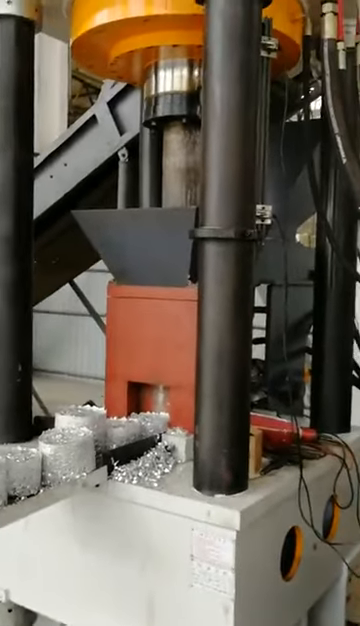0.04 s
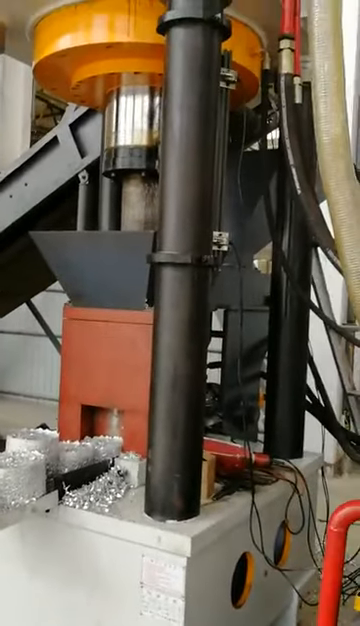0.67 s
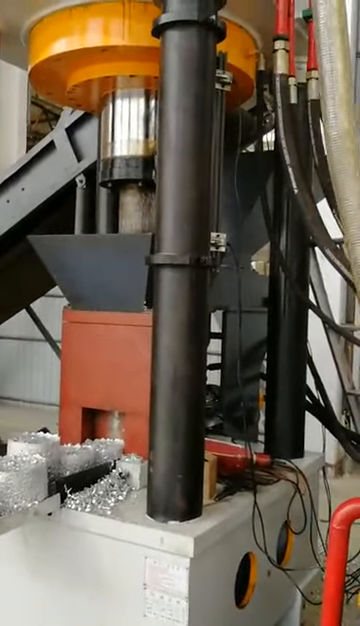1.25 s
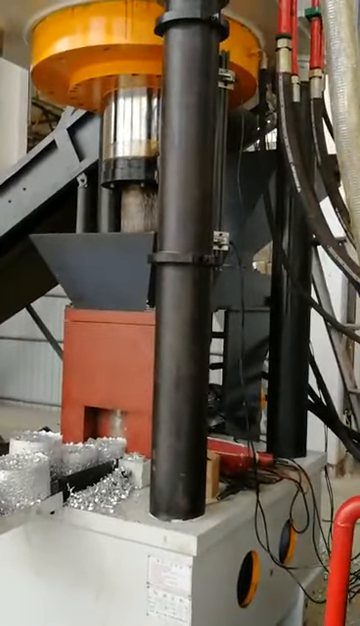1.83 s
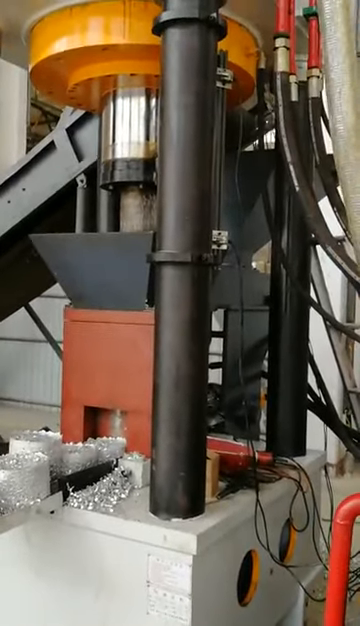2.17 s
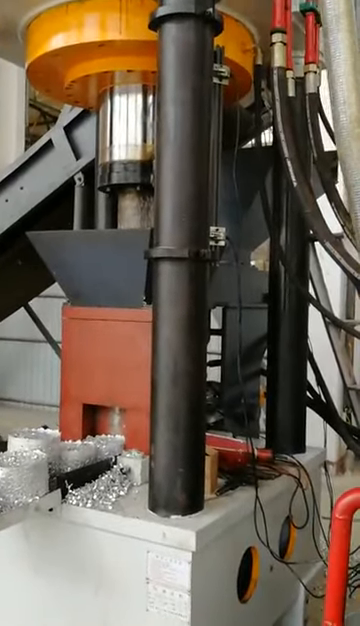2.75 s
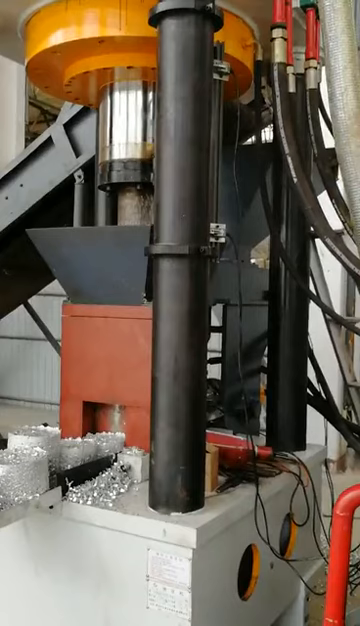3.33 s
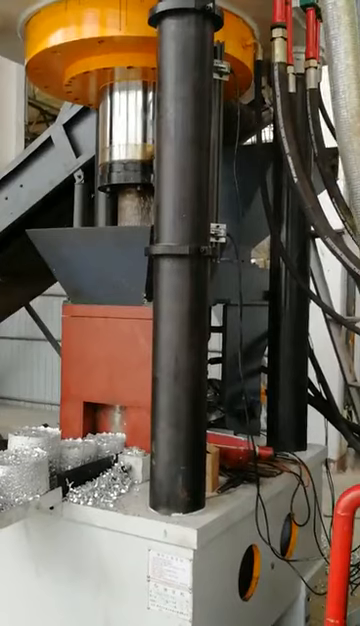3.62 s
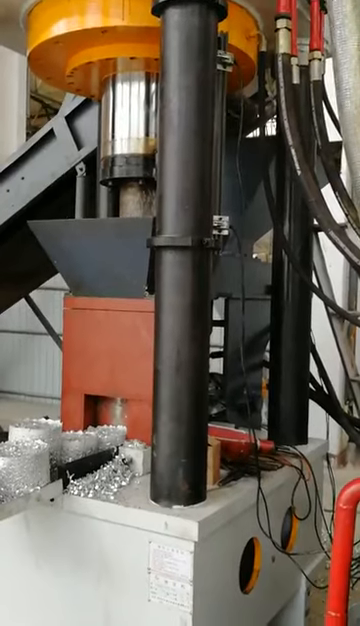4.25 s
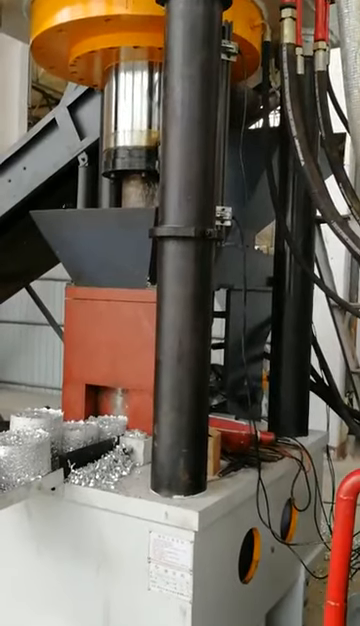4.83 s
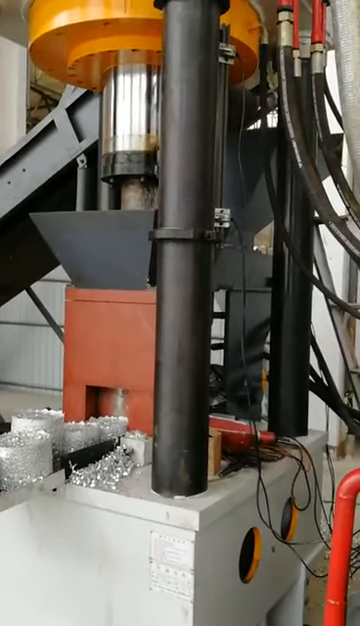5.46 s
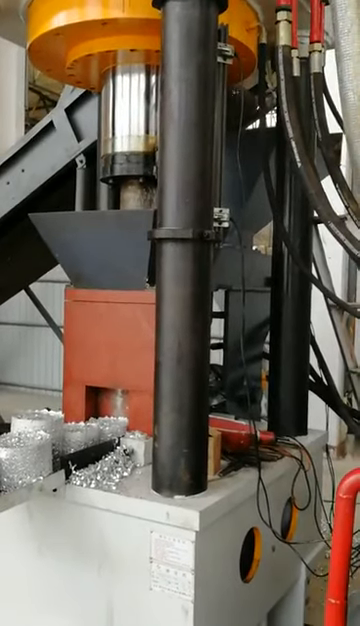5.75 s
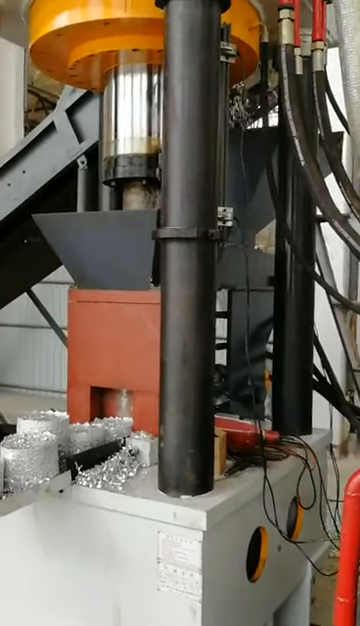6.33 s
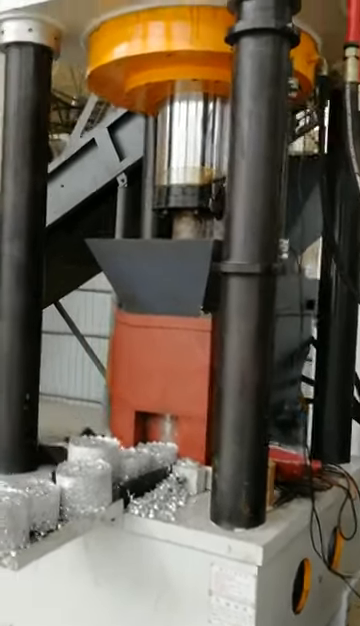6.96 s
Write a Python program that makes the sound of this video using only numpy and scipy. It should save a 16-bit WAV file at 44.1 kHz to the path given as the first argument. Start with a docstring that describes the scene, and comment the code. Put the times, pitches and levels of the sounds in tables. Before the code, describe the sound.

After a moment of light idling, the pumps of a nearby hydraulic press take up the strain and hum with a slow throb, while oil rushes through the ringing tank and pipes. Loose metal chips trickle now and then, finishing in a continuous hissing pour. Thin motor whines and a low rumble fill the workshop behind. The hand-held microphone hears the machine louder and brighter on the left.

```python
"""A deep, slowly throbbing drone with rushing oil and trickling metal chips, ending in a bright hiss.
It is a hydraulic press squeezing chips into briquettes in a workshop. Two seven-piston pumps come
under load; their motors run at almost the same speed, so the hum swells and fades. Oil makes the tank
and pipes ring. Loose chips tick as they fall, now and then at first, and at the end in a steady pour.
Behind it all, motors and fans whine and the floor rumbles."""
import sys
import numpy as np
from scipy import signal
from scipy.fft import rfft, irfft
from scipy.io import wavfile

SR = 44100
rng = np.random.default_rng(int(sys.argv[2]) if len(sys.argv) > 2 else 0)


def store_pcm(level_fs):
    """Save levels as 16-bit WAV."""
    pcm = np.round(np.clip(level_fs, -1, 1) * 32767).astype(np.int16)
    wavfile.write(sys.argv[1], SR, np.atleast_2d(pcm).T)


N = 308259
TIME = np.arange(N) / SR
FREQS = np.maximum(np.fft.rfftfreq(N, 1 / SR), 1)

# how much quieter the shaded right side of the microphone is: (frequency [Hz], left minus right [dB])
RIGHT_SHADE = [(60, 0.5), (174, 0.78), (348, 3), (520, 8.8), (870, 10.1), (1400, 13.8), (2200, 17.3),
               (3400, 21.2), (5200, 22), (7500, 25)]


def pump_drive(idle_hz=175.0, loaded_hz=174.0):
    """Load (1 = full) slows the motors a little. Returns the stroke angle, a turn per stroke, and load."""
    # the pumps idle, work hard as the ram meets the chips, then ease off: (time [s], load [dB])
    load_curve = [(0, -21.5), (.28, -14.5), (.7, -12.5), (.9, 0), (1.45, 1), (3.6, 0), (4.6, 0.5),
                  (5.95, 0.6), (6.99, -2)]
    load = from_db(in_time(load_curve))
    strokes_hz = idle_hz + (loaded_hz - idle_hz) * np.minimum(load, 1)
    return 2 * np.pi * np.cumsum(strokes_hz) / SR, load


def pumps(stroke, load, pistons=7, flutter=0.13, rattle=0.078, jitter=0.014, uneven=0.066,
          roughness=0.41, sway_db=1.5):
    """Two pumps make the oil pressure ripple; the hum throbs as they slide in and out of step."""
    # how much slower the second pump runs: (time [s], speed gap [strokes per s])
    speed_gap = [(0, 0.38), (1.5, 0.26), (2.5, 0.33), (5.5, 0.3295), (7, 0.24)]
    # strong harmonics (multiples of the stroke rate) at full load:
    # (harmonic [number], first pump [dB], second pump [dB], time they cancel most [s])
    strong_tones = [(1, -33.5, -33.5, 1.87), (2, -41, -29.5, 2.14), (3, -52.5, -62, 1),
                    (4, -42, -48, 2.008), (5, -40, -56.5, 3.19)]
    # weaker harmonics at full load; those between are filled in: (harmonic [number], level [dB])
    weak_tones = [(7, -55.5), (8, -61), (9, -61), (10, -53), (11, -58), (12, -69), (14, -60.5), (16, -67.5),
                  (20, -73), (23, -74.5), (26, -76)]
    behind = 2 * np.pi * np.cumsum(in_time(speed_gap)) / SR
    shaft = stroke / pistons
    # unequal pistons nudge the strokes once a turn, adding faint tones beside each strong one
    phase = stroke + jitter * drift(26) + uneven * np.sin(shaft)
    hum = np.zeros(N)
    for harmonic, first_db, second_db, cancel_s in strong_tones:
        apart = harmonic * (behind - np.interp(cancel_s, TIME, behind))
        angle = harmonic * phase + rng.uniform(0, 2 * np.pi)
        pair = from_db(first_db) * np.sin(angle) - from_db(second_db) * np.sin(angle - apart)
        # higher tones sway more in the hall
        sway = from_db(sway_db * harmonic / len(strong_tones) * drift(1.7))
        hum += pair * sway * (1 + flutter * drift(33) + rattle * drift(43))
    harmonics, levels_db = np.transpose(weak_tones)
    for harmonic in range(7, 27):
        angle = harmonic * stroke + rng.uniform(0, 2 * np.pi)
        level = from_db(np.interp(harmonic, harmonics, levels_db))
        hum += level * np.sin(angle + roughness * drift(16)) * (1 + roughness * drift(3.6))
    return np.sqrt(2) * load * hum


def panel(stroke, harmonic=6, waver=0.25, steady_db=-55.5, swell_db=-43, peak_s=1.48, swell_s=0.29):
    """A steel panel buzzes along with the pumps, swelling once as the frame takes up the strain."""
    swell = np.exp(-((TIME - peak_s) / swell_s) ** 2)
    level = from_db(steady_db) + from_db(swell_db) * swell
    return np.sqrt(2) * level * (1 + waver * drift(12)) * np.sin(harmonic * stroke)


def oil(stroke, load, load_power=0.44, pulsing=0.42, hiss_db=-1.0, sing_db=-6.0, patchy_db=2.0):
    """Swirling oil, pushed in spurts by the pistons, rings the tank; the valve hisses and sings."""
    # where tank and pipes ring at full load: (frequency [Hz], width [Hz], level [dB per Hz])
    tank_rings = [(140.8, 25, -65.5), (355, 58.7, -56.5), (511, 130, -71.5), (692, 121, -66.5),
                  (864, 81, -67.5), (1110, 150, -72), (1417.7, 81, -68.5), (1747, 99, -72),
                  (2025, 260, -79)]
    # where the valve rings: (frequency [Hz], width [Hz], relative level [dB])
    valve_rings = [(1571, 170, -23.5)]
    # oil flowing through the valve: (time [s], relative level [dB])
    valve_flow = [(0, -45), (.65, -52), (1.0, -39), (1.35, -47.5), (1.78, -47), (1.9, -38), (2.02, -44),
                  (3.05, -43), (3.25, -50.5), (4.8, -50.5), (5.87, -40), (6.17, -57.5), (6.74, -38.5),
                  (6.99, -44.5)]
    # sudden surges of pressure: (time [s], level [dB], fade time [s])
    surges = [(.912, -30.5, 0.091), (2.61, -36.5, 0.065)]
    # the tone of a surge: (frequency [Hz], relative level [dB])
    surge_colour = [(150, -5), (450, -3.5), (1000, -3), (2000, -7.5), (2600, -18), (7000, -39)]
    spurts = 1 + pulsing * np.cos(stroke)
    tank = filtered(rng.standard_normal(N) * spurts, resonances(tank_rings)) * np.sqrt(SR / 2)
    sing = np.sqrt(2) * np.sin(9 * stroke + .5 * drift(8))   # the pumps' ninth harmonic
    hiss = noise(resonances(valve_rings)) * spurts
    valve = from_db(in_time(valve_flow)) * (from_db(hiss_db) * hiss + from_db(sing_db) * sing)
    surge_level = sum(from_db(db) * decay(start, fade_s) for start, db, fade_s in surges)
    surge = rms_one(noise(colour(surge_colour))) * surge_level
    return tank * load ** load_power * from_db(patchy_db * drift(8.9)) + valve + surge


def bypass(load):
    """Oil spills through a side passage while the pumps idle; its hiss is gone at full load."""
    # bands of hiss with no load: (frequency [Hz], width [Hz], level [dB per Hz])
    hiss_bands = [(1136, 240, -70.5), (2080, 370, -74.5), (3300, 5300, -83)]
    return noise(resonances(hiss_bands)) * np.clip(1 - load, 0, 1)


def chips(ticks_per_s=3400, size_db=1.0, ring_db=0.5, slide_db=-2.5, patchy_db=0.55,
          trickle_db=-52, loose_gain_db=-0.5, pour_db=-28.5, pour_at_s=6.15, pour_rise_s=0.17):
    """Tiny metal chips tick, ring and slide; the final pour also stirs the hopper's lower ring."""
    # clumps land, then slide to rest: (time [s], relative level [dB], landing time [s], slide time [s])
    clumps = [(0, -31.5, .004, 0.1), (.74, -36.5, 0.0056, 0.14), (2.01, -35, 0.073, 0.22),
              (2.174, -36.5, .015, 0.073), (3.18, -46, .015, .1), (3.43, -45.5, .02, 0.069),
              (3.916, -41, .01, 0.15), (4.095, -41.5, .01, 0.091), (6.048, -40.5, .008, 0.32),
              (6.195, -31, .02, 0.23), (6.545, -25.5, 0.0061, 0.047), (6.725, -28, .01, .07)]
    # the thin tone of a trickle: (frequency [Hz], relative level [dB])
    trickle_colour = [(1500, -31), (3000, -9), (4400, 0), (5300, -0.5), (6400, 3), (7400, 5.5),
                      (8000, -6.5)]
    # the fuller tone of the pour: (frequency [Hz], relative level [dB])
    pour_colour = [(710, -35.5), (1200, -7.5), (1570, -8.5), (1690, -2.5), (2320, -6.5), (3250, -3.5),
                   (3510, -5.5), (4490, -0.5), (6340, -3), (7220, 5), (7500, -4.5), (9750, -28.5),
                   (16500, -120)]
    sizes = from_db(size_db * np.minimum(rng.exponential(1, N), 4)) * rng.standard_normal(N)
    ticks = rms_one(sizes * (rng.random(N) < ticks_per_s / SR))
    grains = rms_one(ticks + from_db(ring_db) * chip_rings() + from_db(slide_db) * rng.standard_normal(N))
    trickle = rms_one(filtered(grains, colour(trickle_colour)))
    pour = rms_one(filtered(grains, colour(pour_colour)))
    # separate falls of chips add in power (level squared)
    clump_power = sum((from_db(db) * rise(start, land_s) * decay(start, slide_s)) ** 2
                      for start, db, land_s, slide_s in clumps)
    loose = from_db(loose_gain_db) * np.sqrt(from_db(trickle_db) ** 2 + clump_power)
    stream = from_db(pour_db) * rise(pour_at_s, pour_rise_s)   # the hopper lets go
    blend = (loose ** 2 * trickle + stream ** 2 * pour) / np.hypot(loose, stream)
    return from_db(patchy_db * drift(17)) * blend


def chip_rings(ring_s=.02, spread_db=2.5, count=9000, samples=3500):
    """Single chips ring briefly, each at a pitch of its own."""
    rings = np.zeros(N + samples)
    t = np.arange(samples) / SR
    fade = np.exp(-t / ring_s)
    for when, pitch, weight in rng.random((count, 3)):
        start, hz = int(when * N), 1200 + pitch * 6400
        blow = from_db(spread_db * min(-np.log(weight), 4))
        rings[start:start + samples] += blow * np.sin(2 * np.pi * hz * t) * fade
    return rms_one(rings[:N])


def bouncing_chip(ring_s=0.023):
    """Each bounce of a larger chip rings one short note."""
    # the bounces: (time [s], pitch [Hz], peak level [dB])
    bounces = [(3.94, 6300, -49.5), (3.998, 6350, -45.5), (4.103, 6300, -44), (4.158, 6300, -46)]
    return sum(from_db(db) * ping(start, hz, ring_s) for start, hz, db in bounces)


def whines(waver=0.52):
    """Motors and fans give steady tones that waver in the hall."""
    # the tones: (pitch [Hz], level [dB])
    tones = [(309, -47.5), (608, -55), (1068, -54.5), (1078, -62), (1507, -55.5), (1593, -56), (3079, -63),
             (3580, -60.5)]
    whine = np.zeros(N)
    for hz, db in tones:
        level = from_db(db) * (1 + waver * drift(7))
        whine += level * np.sin(2 * np.pi * hz * TIME + 2 * waver * drift(3))
    return np.sqrt(2) * whine


def rumble(lumpy_db=1.5, bump_s=0.0068):
    """The floor shakes unevenly, and the hand-held microphone takes a few soft bumps."""
    # the floor shakes least partway through the pressing: (time [s], level [dB])
    shaking = [(0, -45), (.4, -47), (2.3, -46), (3.7, -48.5), (4.6, -54.5), (6.99, -45)]
    # the deep tone of the floor: (frequency [Hz], relative level [dB])
    floor_colour = [(10, 3), (25, 2), (50, -4), (100, -19), (160, -18), (400, -54)]
    # bumps on the microphone: (time [s], level [dB], pitch [Hz])
    bumps = [(0.074, -34, 44.8), (0.102, -21, 85.6), (3.586, -22.5, 65.5)]
    floor = from_db(in_time(shaking) + lumpy_db * drift(3)) * rms_one(noise(colour(floor_colour)))
    return floor + sum(from_db(db) * ping(start, hz, bump_s) for start, db, hz in bumps)


def workshop(hall_from_hz=70):
    """Steady background noise: one part close by, and one spread through the hall with less deep bass."""
    # the tone of the workshop: (frequency [Hz], level [dB per Hz])
    room_colour = [(30, -79), (110, -79), (180, -67.5), (230, -70), (560, -77), (800, -74.5), (970, -80),
                   (1100, -78), (1280, -79.5), (1800, -79.5), (2600, -82), (3700, -80.5), (4500, -85.5),
                   (6000, -90), (7500, -97)]
    room = colour(room_colour)
    bass_cut = FREQS / np.hypot(FREQS, hall_from_hz)
    return noise(room), noise(room / colour(RIGHT_SHADE) * bass_cut)


def stereo_microphone(sound, scatter_s=0.056, scatter_hz=2600):
    """The right side hears a later, duller copy of the left, its treble mostly from reflections."""
    # how far the right side trails the left: (frequency [Hz], phase lag [radians])
    right_lag = [(20, 0.5), (174, 1.06), (348, 1.86), (696, 3.5), (870, 4.3), (1640, 6.85), (2670, 10),
                 (3960, 13.5), (8000, 27)]
    shade = colour(RIGHT_SHADE)
    direct = 1 / np.sqrt(1 + (FREQS / scatter_hz) ** 3)
    echo_tail = rng.standard_normal(N) * decay(0, scatter_s)
    reflections = np.exp(1j * np.angle(rfft(echo_tail)))
    delayed = direct * np.exp(-1j * np.interp(FREQS, *np.transpose(right_lag)))
    left_to_right = (delayed + np.sqrt(1 - direct ** 2) * reflections) / shade
    left = 2 / (1 + delayed / shade)   # the average of both sides keeps about the same level
    return np.array([filtered(sound, left), filtered(sound, left * left_to_right)])


def from_db(db):
    """Turn decibels into a gain to multiply by."""
    return 10 ** (np.asarray(db) / 20)


def rms_one(x):
    """Scale a signal so its average strength (rms) is 1."""
    return x / np.sqrt(np.mean(x ** 2) + 1e-20)


def in_time(points):
    """Join (time, value) points with straight lines, giving a value at every sample."""
    return np.interp(TIME, *np.transpose(points))


def colour(points):
    """Join (Hz, dB) points into a gain at every frequency."""
    hz, db = np.transpose(points)
    return from_db(np.interp(np.log(FREQS), np.log(hz), db))


def resonances(peaks):
    """Gain at every frequency, with a steep peak wherever something rings."""
    powers = (from_db(db) ** 2 / (1 + 2 * ((FREQS - hz) / width) ** 2) ** 3 for hz, width, db in peaks)
    return np.sqrt(sum(powers))


def filtered(x, gain):
    """Turn each frequency of x up or down by its gain."""
    return irfft(rfft(x) * gain, N)


def noise(gain):
    """Noise whose strength at each frequency (per root Hz) is the given gain."""
    return filtered(rng.standard_normal(N), gain) * np.sqrt(SR / 2)


def drift(rate_hz):
    """A smooth random wander of typical size 1, worked out every 40 samples."""
    pole = np.exp(-80 * np.pi * rate_hz / SR)
    kicks = rng.standard_normal(N // 40 + 2002)
    slow = signal.lfilter([1], [1, -2 * pole, pole * pole], kicks)[2000:]   # skip the settling time
    return np.interp(np.arange(N) / 40, np.arange(len(slow)), rms_one(slow))


def decay(start, length):
    """A level that jumps to 1 at start and dies away."""
    return (TIME >= start) * np.exp(-np.clip((TIME - start) / length, 0, 50))


def rise(start, length):
    """A level that begins to grow at start and settles at 1."""
    return (TIME >= start) - decay(start, length)


def ping(start, hz, length):
    """One struck note that dies away."""
    return decay(start, length) * np.sin(2 * np.pi * hz * (TIME - start))


def scene():
    """The press close by in stereo, with extra hall noise on the right side."""
    stroke, load = pump_drive()
    hydraulics = bypass(load) + pumps(stroke, load) + panel(stroke) + whines() + oil(stroke, load)
    press = hydraulics + chips() + bouncing_chip() + rumble()
    near_noise, hall_noise = workshop()
    left, right = stereo_microphone(press + near_noise)
    return np.array([left, right + hall_noise])


def record(dry, cutoff_hz=7580):
    """A steep filter cuts off the highest treble."""
    return signal.sosfilt(signal.ellip(14, .1, 90, cutoff_hz, fs=SR, output="sos"), dry)


dry = scene()
out = record(dry)
store_pcm(out)
```